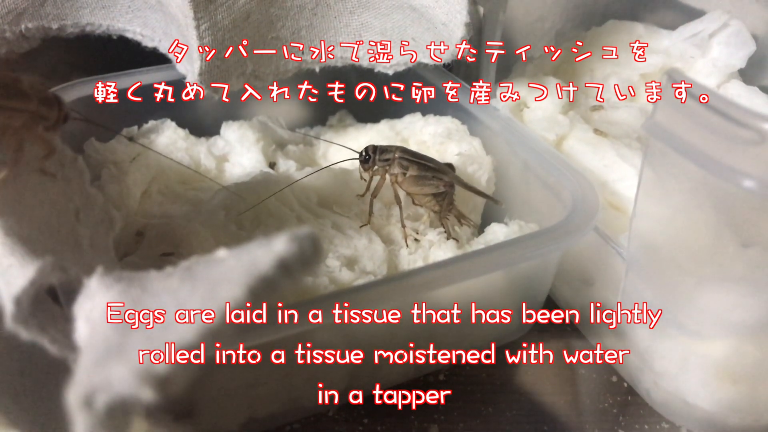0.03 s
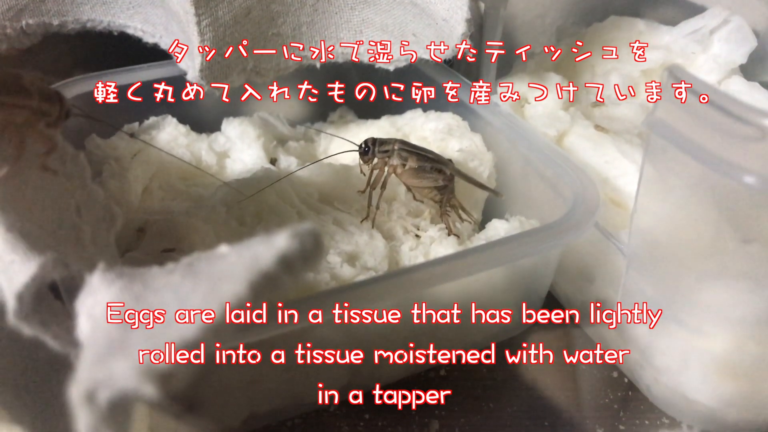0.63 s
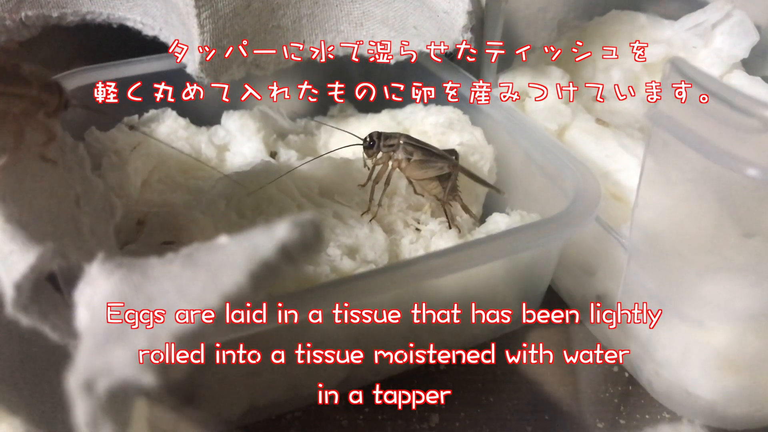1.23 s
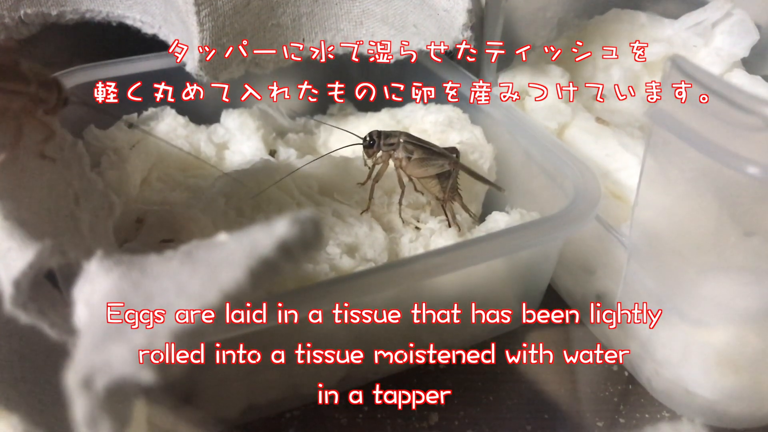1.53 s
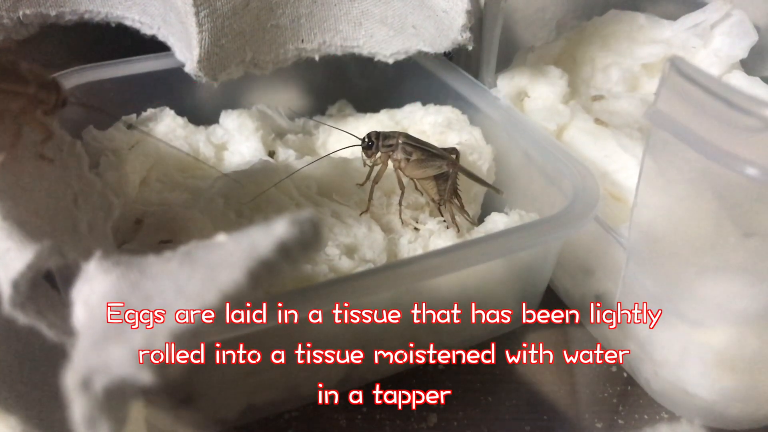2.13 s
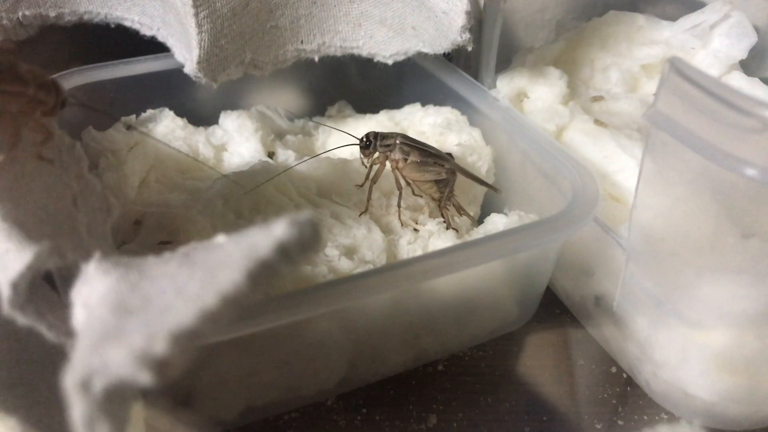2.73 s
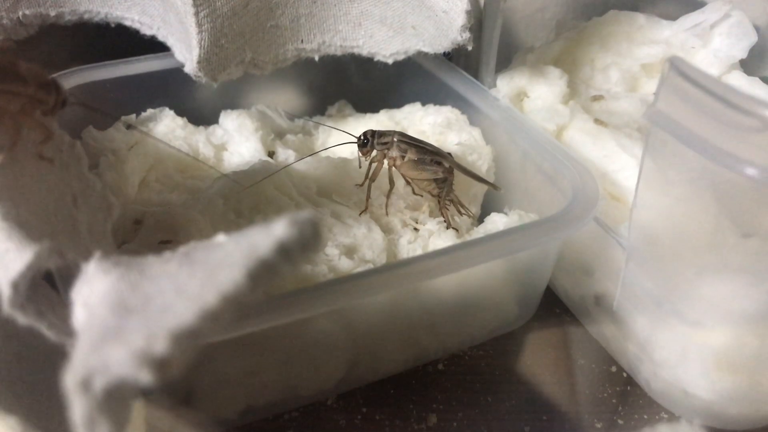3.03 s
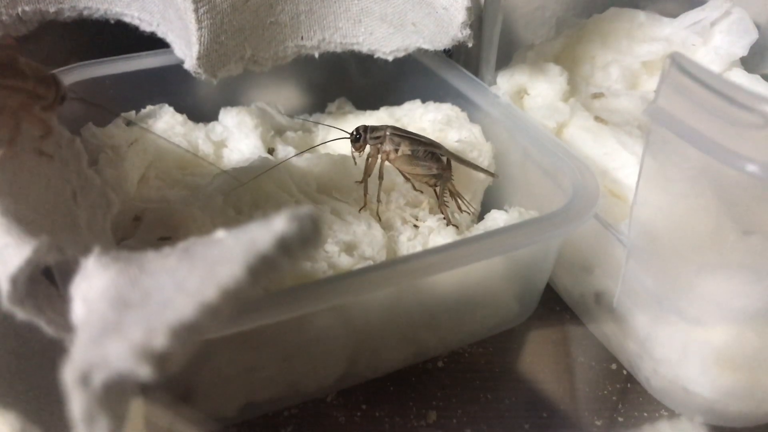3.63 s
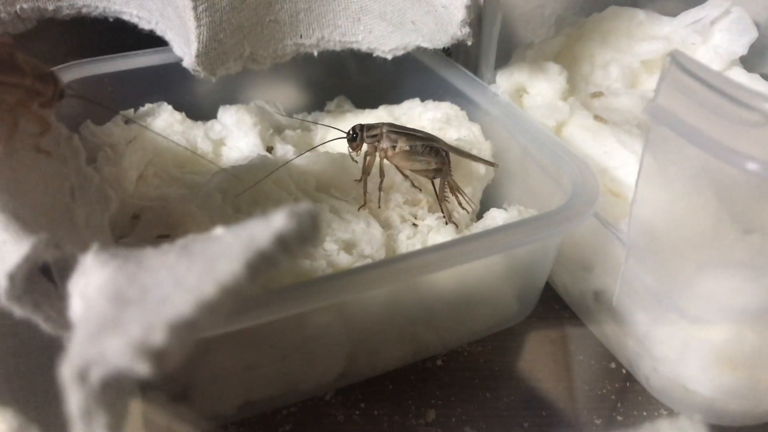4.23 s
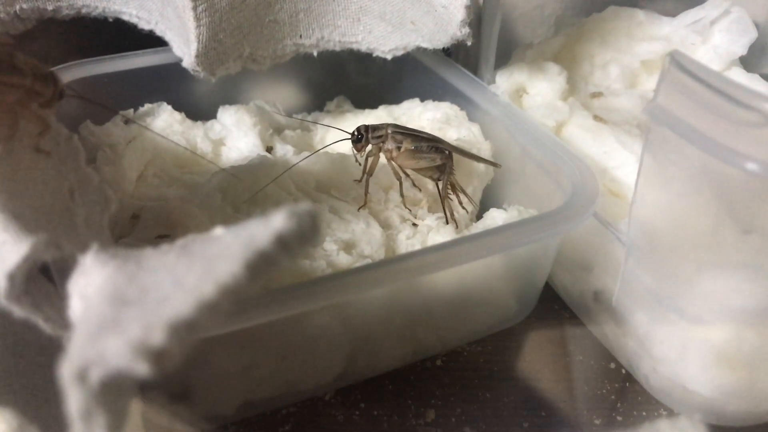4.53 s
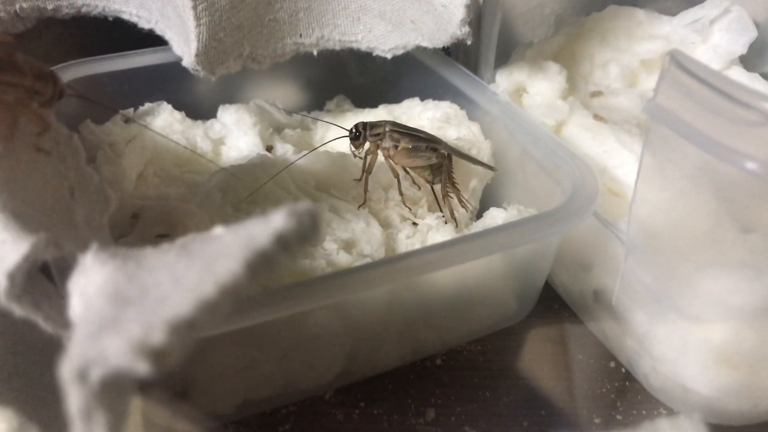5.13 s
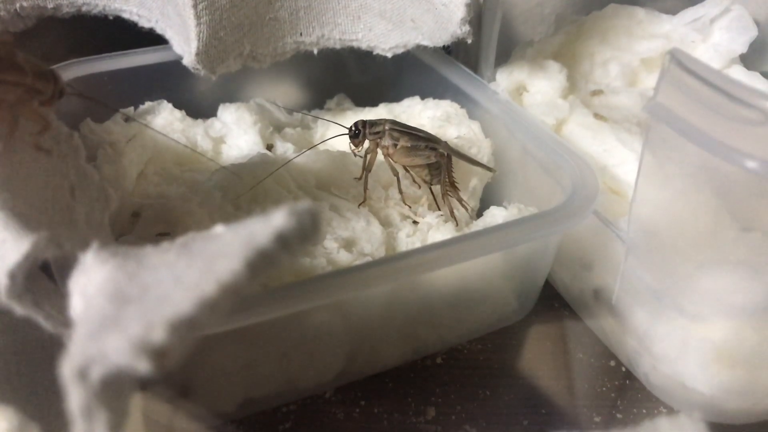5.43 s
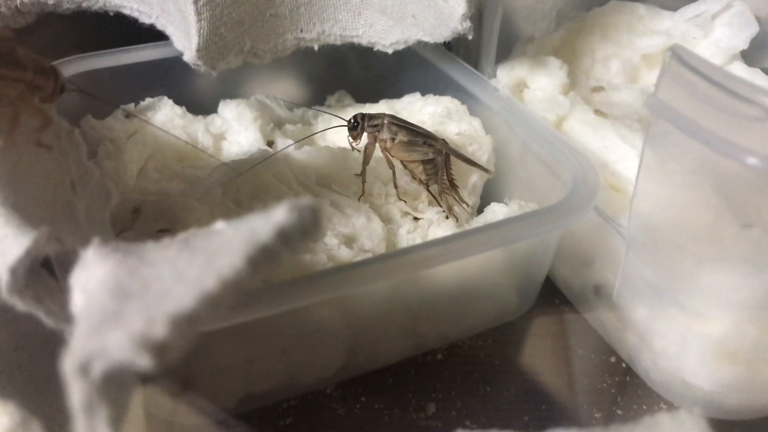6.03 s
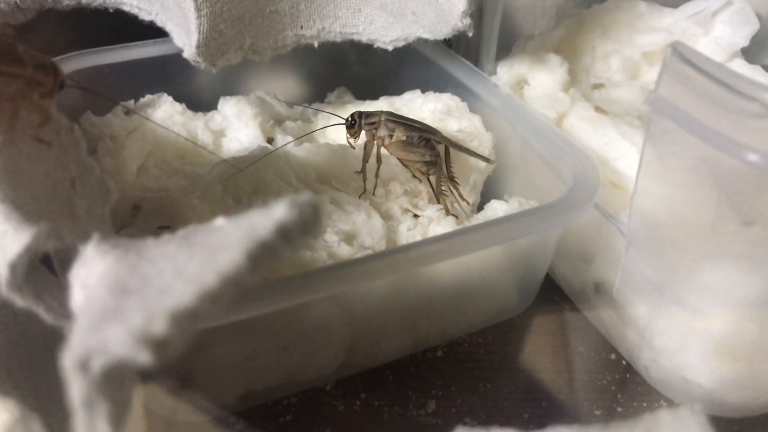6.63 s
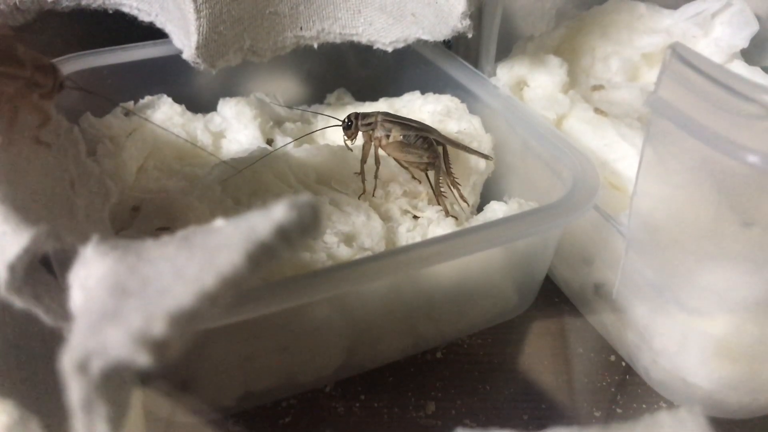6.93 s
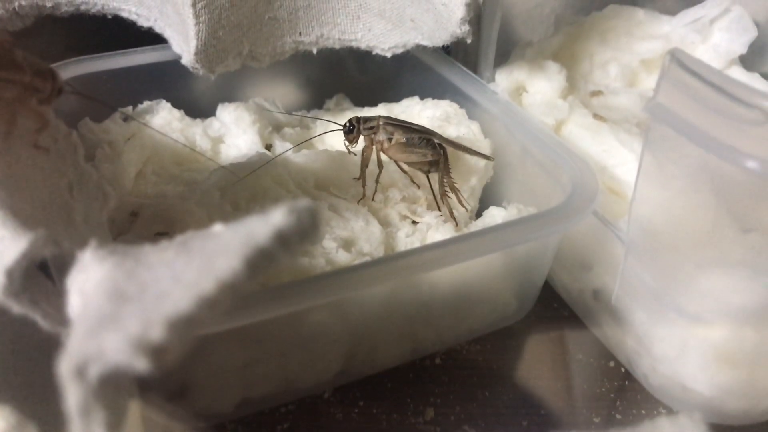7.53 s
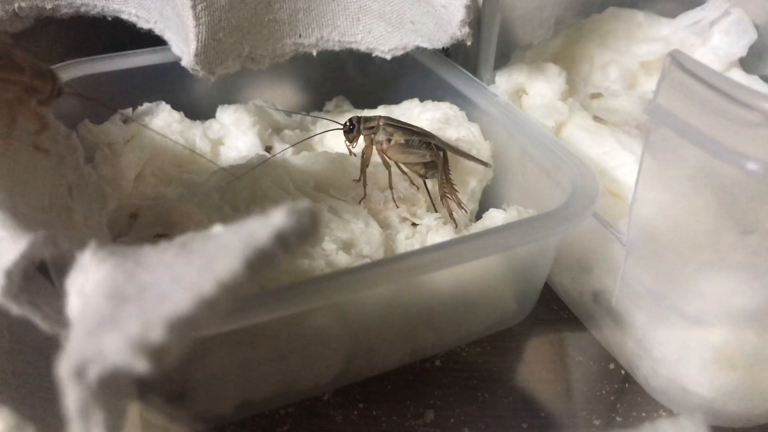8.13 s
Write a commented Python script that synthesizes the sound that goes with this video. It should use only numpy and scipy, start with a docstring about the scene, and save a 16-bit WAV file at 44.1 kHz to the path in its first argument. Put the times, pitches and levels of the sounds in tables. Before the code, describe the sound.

A small fan keeps up a low hum, a faint whine and an airy hiss in a quiet room. Close to the microphone, crickets in a plastic container start with a few tiny chirps, then give brief pulsed bouts every second or two, some clear and some scratchy. Behind them are faint, regular clock ticks, one a little sharper than the rest, along with a weak low rumble and occasional soft bumps.

```python
"""Crickets chirp in short bouts inside a plastic rearing box, close by in a quiet room.
Each wing stroke drags a scraper over a toothed file: a falling tone when the teeth catch evenly,
a rasp when they skid. A small fan hums and whines over a rush of air, a low rumble comes and goes
with a few soft bumps, and a clock escapement ticks faintly once a second."""
import sys
import numpy as np
from scipy import signal
from scipy.fft import rfft, irfft
from scipy.io import wavfile

SR = 44100
rng = np.random.default_rng(int(sys.argv[2]) if len(sys.argv) > 2 else 0)


def int16_out(signal):
    """Quantize to a 16-bit WAV file."""
    q = np.round(np.clip(np.atleast_2d(signal).T, -1, 1) * 32767)
    wavfile.write(sys.argv[1], SR, q.astype(np.int16))


N = 370440
TIME_S = np.arange(N) / SR
FREQS_HZ = np.arange(N // 2 + 1) * SR / N

# Fan speed. Each row: time in seconds, blade rate in Hz.
FAN_SPEED = [(0, 1331), (1.3, 1326.5), (3.4, 1328.7), (4.5, 1331.5), (5.3, 1329), (6.6, 1332.5),
             (7.7, 1333), (8.4, 1331)]
# Fan hum. Each row: time in seconds, level in dB.
FAN_HUM = [(0, -41), (1, -42), (3, -41.5), (8, -41)]
# Fan overtones. Each row: multiple of the shaft rate, level in dB.
FAN_OVERTONES = [(14, -78), (16, -83), (20, -83), (21, -81), (24, -80.5), (28, -82.5), (52, -89)]
# Base spectrum of the air. Each row: frequency in Hz, noise density in dB (1 Hz band).
AIR_SPECTRUM = [(25, -113), (47, -83.5), (85, -85.5), (160, -90.5), (270, -93), (400, -96.5), (750, -92),
                (1300, -94), (2300, -99), (3200, -103), (4100, -101), (6500, -111), (10500, -119),
                (15500, -120)]
# Peaks and dips of fan housing and box. Each row: centre in Hz, width in Hz, lift in dB.
HOUSING_BANDS = [(268.4, 46, 6), (548, 18, 5.5), (760, 91, 4), (818, 21, 7.5), (1025, 16, 8.5),
                 (1058, 23, 6), (1537, 52, -9.5), (1890, 48, 4), (2252, 69, 4.5), (2350, 70, -8.5),
                 (3265, 270, -4.5), (3540, 66, 2), (4840, 200, -5), (5080, 120, 2.5), (8840, 610, 4),
                 (12400, 790, 5.5)]
# Rumble. Each row: time in seconds, relative levels of the lower and upper drone in dB.
RUMBLE_LEVELS = [(0, -69, -63), (1.9, -65.5, -62.5), (2.6, -57.5, -69), (4.05, -62, -69),
                 (4.35, -51.5, -63), (5.1, -56, -69), (5.35, -67, -60), (5.7, -57, -65), (8.4, -59, -65.5)]
# Low bumps. Each row: start in seconds, level in dB.
BUMPS = [(.289, -58.5), (1.15, -58), (5.258, -55)]
# Wing resonances rung by skidding teeth. Each row: centre in Hz, width in Hz, gain in dB.
WING_MODES = [(4630, 500, -12), (5320, 540, -3), (5930, 400, -9.5), (6700, 360, -6.5), (8830, 990, -7),
              (11770, 480, -8.5)]
# Toneless wing flicks. Each row: start in seconds, level in dB, hiss centre in Hz.
WING_FLICKS = [(.205, -62.5, 12100), (1.165, -56, 12400), (1.202, -53, 12900), (1.241, -52, 13000),
               (2.413, -72, 13900), (2.46, -67, 13900), (2.513, -67, 13900), (7.946, -66, 13900),
               (8.0, -69, 13900), (8.088, -64, 13000)]
# Wing strokes. Each row: start in seconds, length in seconds, nominal tooth rate in Hz,
# nominal tone level in dB, second push over first in dB, rasp level in dB.
WING_STROKES = [ (0.3, 0.019, 4920, -50.5, 3, -57), (1.129, 0.013, 4930, -46, 3, -57),
                (1.284, 0.015, 4910, -43, 5, -58), (1.327, 0.018, 4910, -42, 4, -60.5),
                (1.815, 0.015, 4300, -44, 0, -80), (1.858, .026, 4466, -38, 6.5, -76),
                (1.945, 0.031, 4770, -47, 2, -58.5), (1.989, 0.03, 4780, -40, 3.5, -51),
                (2.036, .031, 4770, -40, 1, -53), (3.43, 0.037, 4804, -40.5, -15, -53),
                (3.471, 0.035, 4880, -35, -6, -51.5), (3.518, 0.042, 4820, -37, -4.5, -52.5),
                (3.591, 0.025, 4720, -53, 2, -61), (3.642, .018, 4860, -46, 8, -56),
                (5.226, 0.024, 4530, -48, 4.5, -58), (5.268, .024, 4510, -40.5, 3, -51.5),
                (5.322, 0.022, 4545, -37.5, 8, -51), (5.844, 0.014, 4290, -42, -2, -80),
                (5.884, 0.024, 4440, -38, 10, -76), (6.956, .018, 4730, -51.5, -1, -60),
                (6.996, .018, 4910, -44, 7, -52.5), (7.039, 0.025, 4660, -44.5, 4, -53),
                (7.084, .023, 4610, -40.5, 2, -51.5), (7.138, .021, 4630, -41, 4, -52)]
# Wing resonances carrying the overtones. Each row: centre in Hz, width in Hz, gain in dB.
WING_OVERTONE_MODES = [(9300, 1200, -2.5), (14000, 2200, 0)]
# Clock case resonances. Each row: centre in Hz, width in Hz, relative gain per pass in dB.
CASE_MODES = [(2290, 1400, 1.5), (4000, 1200, -3.5), (6940, 600, -1.5), (8600, 1400, -6)]
# Escapement click. Each row: time in seconds, level in dB.
CLICK_LEVELS = [(2.8, -54.5), (5.8, -73), (7.8, -70)]

CATCH_SHARE, DRAG_SHARE, CATCH_MAX_S = 0.82, 0.63, 0.015  # two overlapping pushes per stroke
STEADY_S, SAG_HZ_PER_S = 0.014, 24900  # longer strokes lose tooth rate
SAG_AT_SHARE, SAG_S = 0.9, 0.0032  # the wing slows late in the catch
JERK_SHARE, JERK_S = 0.9, 0.0023  # the scraper jumps the first teeth: a quick pitch drop
SKID_LEAD_S, CATCH_SKID_DB = 0.0013, -3.5  # skidding leads each push, weaker in the catch
OVERTONE_DB, OVERTONE_DB_PER_DB = -41, 0.47  # overtones follow the tone level


def undb(db):
    """Decibels to gain."""
    return 10 ** (np.asarray(db) / 20)


def unit_rms(x):
    """Scale to rms 1."""
    return x / np.sqrt(np.mean(x ** 2))


def curves(table):
    """Columns of a timed table, interpolated per sample."""
    times_s, *columns = np.transpose(table)
    return [np.interp(TIME_S, times_s, column) for column in columns]


def add(out, start_s, x):
    """Mix x into out at start_s."""
    i = int(start_s * SR)
    out[i:i + len(x)] += x[:len(out) - i]


def ring(x, modes):
    """Parallel resonators."""
    return sum(undb(db) * signal.lfilter(*signal.iirpeak(hz, hz / width_hz, SR), x)
               for hz, width_hz, db in modes)


def wobble(n, hz):
    """Random drift, hz new values a second, spread near 1."""
    return np.interp(np.arange(n) * hz / SR, np.arange(n), rng.standard_normal(n))


def echoes(x, t60_s, delay_s):
    """Dense decaying reflections of unit energy."""
    t = TIME_S[:SR]
    response = rng.standard_normal(SR) * undb(-60 * t / t60_s) * (t > delay_s)
    return signal.fftconvolve(x, response / np.linalg.norm(response))[:N]


def push(length_s, power):
    """Press-and-release envelope: a half sine raised to a power."""
    n = int(length_s * SR)
    return np.sin(np.pi * (np.arange(n) + .5) / n) ** power


def fan(blades=7, whine_db=-58):
    """The unbalanced rotor hums at the shaft rate; its blades whine above it."""
    blade_hz, = curves(FAN_SPEED)
    hum_db, = curves(FAN_HUM)
    shaft_rad = 2 * np.pi * np.cumsum(blade_hz / blades) / SR
    tones = undb(hum_db) * np.sin(shaft_rad)
    tones += undb(whine_db + .6 * wobble(N, hz=11)) * np.sin(blades * shaft_rad)
    for multiple, db in FAN_OVERTONES:
        tones += undb(db + 1.8 * wobble(N, hz=8)) * np.sin(multiple * shaft_rad)
    return np.sqrt(2) * tones  # levels are rms


def air():
    """Steady rush of moving air, coloured by fan housing and box."""
    hz, db = np.transpose(AIR_SPECTRUM)
    colour_db = np.interp(np.log(FREQS_HZ + 1), np.log(hz), db)
    for centre_hz, width_hz, lift_db in HOUSING_BANDS:
        colour_db += lift_db / (1 + (2 * (FREQS_HZ - centre_hz) / width_hz) ** 4)
    return irfft(rfft(rng.standard_normal(N)) * undb(colour_db), N) * np.sqrt(SR / 2)


def rumble(drones_hz=(53, 68)):
    """Two low drones waver in pitch, swell and fade."""
    out = np.zeros(N)
    for centre_hz, db in zip(drones_hz, curves(RUMBLE_LEVELS)):
        hz = centre_hz * (1 + 0.0605 * wobble(N, hz=12))
        drone = unit_rms(np.sin(2 * np.pi * np.cumsum(hz) / SR))
        out += undb(db - 2 + 2 * wobble(N, hz=8)) * drone
    return out


def rasp(envelope, hiss_hz, width_hz=2000, scatter_db=4):
    """Skidding teeth ring the wing membrane with uneven clicks; the scraper edge hisses."""
    n = len(envelope)
    clicks, scrape = rng.standard_normal((2, n)) * undb(scatter_db * wobble(n, hz=1430))
    edge = [(hiss_hz, width_hz, 0)]
    hiss = ring(ring(scrape, edge), edge) + undb(-25) * scrape
    return envelope * unit_rms(ring(clicks, WING_MODES) + hiss)


def bumps(hz=70.3):
    """Soft bumps: short swells of a low tone."""
    out = np.zeros(N)
    envelope = push(length_s=0.09, power=1.2)
    tone = unit_rms(np.sin(2 * np.pi * hz * TIME_S[:len(envelope)]))
    for start_s, db in BUMPS:
        add(out, start_s, undb(db) * envelope * tone)
    return out


def wing_stroke(length_s, tooth_hz, tone_db, swell_db, rasp_db):
    """One closure, two pushes: the scraper catches at a high tooth rate, then drags lower and skids."""
    t = TIME_S[:int(length_s * SR)]
    n = len(t)
    catch, drag = np.zeros((2, n))
    catch_s = min(CATCH_MAX_S, CATCH_SHARE * length_s)
    add(catch, 0, undb(-swell_db / 2) * push(catch_s, power=1.75))
    add(drag[::-1], 0, undb(swell_db / 2) * push(DRAG_SHARE * length_s, power=1.3))  # end-aligned
    grip = np.hypot(catch, drag)
    slip = np.interp(t + SKID_LEAD_S, t, undb(CATCH_SKID_DB) * catch + drag) ** 0.96
    slip /= slip.max()
    # More rasp against the tone: less steady pitch and level.
    jitter = min(undb(0.54 * (rasp_db - tone_db)), 1) * slip
    sag_hz = SAG_HZ_PER_S * max(length_s - STEADY_S, 0)
    jerk = JERK_SHARE * np.exp(-t / JERK_S)
    slowing = np.tanh((t - SAG_AT_SHARE * catch_s) / SAG_S) / 2
    hz = (tooth_hz + sag_hz * (jerk - slowing)) * (1 + 0.043 * jitter * wobble(n, hz=1240))
    phase = 2 * np.pi * np.cumsum(hz) / SR
    flutter_db = 9.3 * jitter * wobble(n, hz=423)
    tone = undb(tone_db) * grip * unit_rms(undb(flutter_db) * np.sin(phase))
    overtones = ring(np.sin(2 * phase) + np.sin(3 * phase), WING_OVERTONE_MODES)
    overtones *= undb(OVERTONE_DB + OVERTONE_DB_PER_DB * tone_db) * push(length_s, power=1.3)
    return tone + overtones + undb(rasp_db) * rasp(slip, hiss_hz=14040)


def crickets():
    """Wing strokes and flicks, with quick box echoes and a soft room tail."""
    wings = np.zeros(N)
    for start_s, *shape in WING_STROKES:
        add(wings, start_s, wing_stroke(*shape))
    for start_s, db, hiss_hz in WING_FLICKS:
        add(wings, start_s, undb(db) * rasp(push(length_s=0.012, power=0.86), hiss_hz))
    box = echoes(wings, t60_s=0.066, delay_s=0.0012)
    room_band = [(4470, 8600, 0.0044)]
    room = echoes(ring(wings, room_band), t60_s=0.42, delay_s=0.0036)
    return wings + undb(-6) * box + undb(-15.5) * room


def clock(first_s=0.767, period_s=1, click_decay_s=0.0069, knock_decay_s=0.016, knock_lag_s=0.022):
    """The escapement clicks, the gear settles with a duller knock; the room smears both."""
    out, t = np.zeros(N), TIME_S[:SR // 10]
    gear_modes = [(810, 270, 2), (2200, 1200, 0)]
    for start_s in np.arange(first_s, N / SR, period_s):
        click_db = np.interp(start_s, *np.transpose(CLICK_LEVELS))
        click, knock = (unit_rms(ring(ring(rng.standard_normal(len(t)), modes), modes))
                        for modes in (CASE_MODES, gear_modes))
        add(out, start_s, undb(click_db) * click * np.exp(-t / click_decay_s))
        add(out, start_s + knock_lag_s, undb(-60) * knock * np.exp(-t / knock_decay_s))
    return out + undb(0.5) * echoes(out, t60_s=0.34, delay_s=0.004)


def scene():
    """Mono mix: crickets in front, the rest behind."""
    return (crickets() + clock() + fan() + air() + rumble() + bumps())[None]


def record(dry):
    """Steep low-pass on the top treble."""
    cutoff_hz = 15850
    return signal.sosfilt(signal.ellip(10, .1, 80, cutoff_hz, fs=SR, output="sos"), dry)


dry = scene()
out = record(dry)
int16_out(out)
```